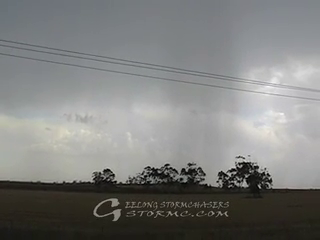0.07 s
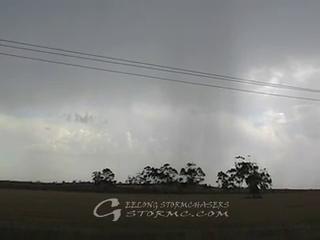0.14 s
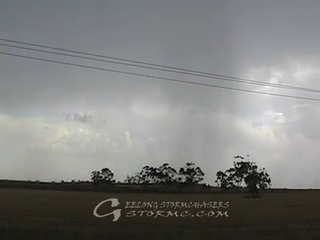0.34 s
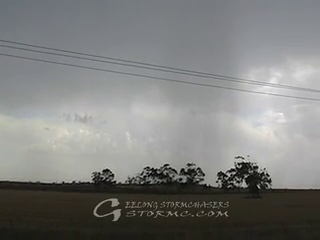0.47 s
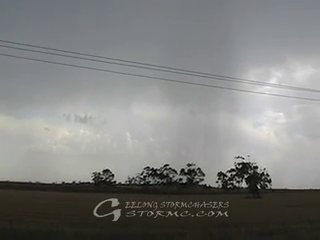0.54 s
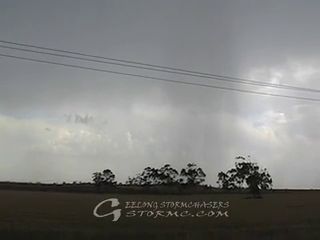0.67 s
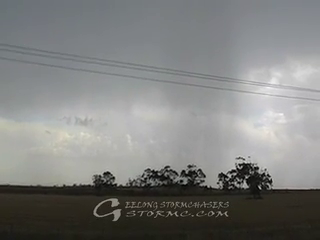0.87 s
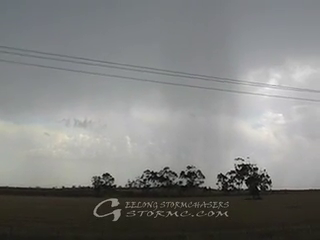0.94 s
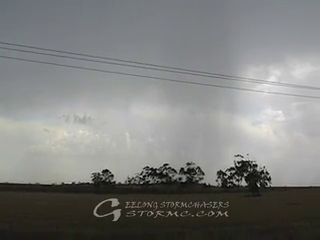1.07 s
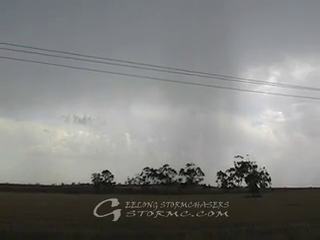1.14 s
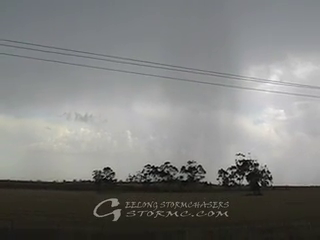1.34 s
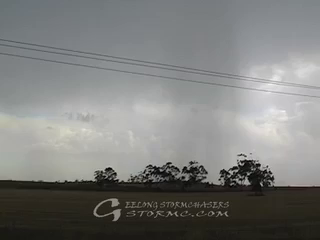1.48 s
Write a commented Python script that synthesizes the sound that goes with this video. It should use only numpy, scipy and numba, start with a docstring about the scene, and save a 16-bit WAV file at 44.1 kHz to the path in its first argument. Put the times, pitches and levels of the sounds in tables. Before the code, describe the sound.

Thunder rolls low over open farmland, breaks into rough crackling peals and heavy booms, then recedes in uneven rumbles; wind thumps the microphone, a faint bird trills far off, and steady hiss lies beneath.

```python
"""A low roll of thunder over open fields and a distant trilling bird, then peals and heavy booms.
The peals are swarms of random shock fronts and the booms single N-waves, both coloured by distance.
The roll swells towards the middle and recedes unevenly. Wind buffets a microphone with two ports as
brief low thumps with turbulence, the bird is gliding tones, a few ticks are short noise bursts.
Steady hiss lies beneath; a gain control pulls everything down, hiss included, when the sound is loud."""
import sys
import numpy as np
from scipy import signal
from scipy.fft import rfft, irfft
from scipy.io import wavfile
from numba import njit

SR = 44100
rng = np.random.default_rng(int(sys.argv[2]) if len(sys.argv) > 2 else 0)


def inscribe(sig):
    """Save sig as 16-bit PCM at rate SR to the path in sys.argv[1].

    A 1-D sig is mono; a 2-D sig holds one channel per row.
    Samples are clipped to [-1, 1] before scaling.
    """
    pcm = np.round(np.clip(np.atleast_2d(sig).T, -1, 1) * 32767)
    wavfile.write(sys.argv[1], SR, pcm.astype(np.int16))


N = 66150  # samples, 1.5 s


def undb(db):
    """Amplitude ratio is ten to the power of level over twenty."""
    return 10 ** (np.asarray(db) / 20)


def unit(x):
    """Normalisation to unit root-mean-square, over all channels together."""
    return x / np.sqrt(np.mean(x ** 2))


def bins():
    """Discrete Fourier frequencies in Hz, zero-padded to 2N; the lowest is raised to 1 Hz."""
    return np.maximum(np.fft.rfftfreq(2 * N, 1 / SR), 1)


def shape(points):
    """Spectrum in dB by linear interpolation of (f/Hz, level/dB) points along log frequency."""
    hz, db = np.array(points, float).T
    return np.interp(np.log(bins()), np.log(hz), db)


def colour(x, db):
    """Minimum-phase filtering: folding the cepstrum makes the response causal."""
    cepstrum = irfft(np.log(undb(db)))
    cepstrum[1:N] *= 2
    cepstrum[N + 1:] = 0
    response = np.exp(rfft(cepstrum))
    return irfft(rfft(x, 2 * N) * response)[..., :N]


def stereo(mid, side):
    """Sum-and-difference principle: left is mid plus side, right is mid minus side."""
    return np.array([mid + side, mid - side])


def thunder_colour():
    """Propagation loss takes the treble; Lorentzian resonances lift narrow bands, in dB."""
    # spectrum of the distant thunder: f/Hz, relative level/dB per Hz
    thunder_spectrum = [(25, -40), (60, -11.5), (105, -18), (135, -8), (170, -2.5), (250, -3.5),
                        (305, -9.5), (360, -6), (500, -11.5), (700, -22), (1000, -23.5), (1500, -30.5),
                        (2000, -40.5), (2600, -55.5), (6000, -87)]
    # resonances at the microphone: f/Hz, width/Hz, lift/dB
    resonances = [(174.5, 25.3, 5.5), (250.3, 34, 7), (417, 26, 0.5), (461.2, 38, 6.5), (642, 13, 2.5),
                  (807, 83, 7), (1049, 48, 3.5), (1361, 33, 6)]
    level = shape(thunder_spectrum)
    for hz, width, lift in resonances:
        level = level + lift / (1 + (2 * (bins() - hz) / width) ** 2)
    return level


def shocks():
    """Poisson-like impulse process: shock fronts of random time, sign and log-normal size."""
    shocks_per_s, scatter_db = 1800, 2.0
    arrives = rng.random(N) < shocks_per_s / SR
    sign = rng.choice([-1, 1], N)
    return arrives * sign * undb(scatter_db * rng.standard_normal(N))


def thunder(t):
    """Incoherent power addition: peals add to the roll, in a deep body and a crackle, alike at both ports."""
    # roll under the peals: t/s, body level/dB, crackle level/dB
    roll = np.array([(0, -33.5, -34.5), (.05, -31, -35), (.12, -32, -36.5), (.2, -36.5, -38.5),
                     (.3, -30, -29.5), (.4, -30, -31.5), (.44, -26, -32), (.545, -25.5, -33.5),
                     (.67, -20, -32), (.72, -27, -31.5), (.77, -26, -33.5), (.82, -27.5, -36),
                     (.92, -31.5, -37), (1.0, -35.5, -38), (1.039, -25.5, -35.5), (1.13, -26.5, -34),
                     (1.23, -29, -34.5), (1.32, -34.5, -39.5), (1.4, -29.5, -41.5), (1.5, -34, -43.5)])
    # peals: start t/s, hold/s, body level/dB, crackle level/dB
    peals = [(0.227, 0.043, -23, -29.5), (0.284, 0.05, -20.5, -44), (0.318, 0.059, -15.5, -31),
             (0.494, 0.042, -28, -35), (0.564, 0.069, -19, -32.5), (0.603, 0.023, -15, -28.5),
             (0.639, 0.011, -16, -27)]
    attack_s, release_s = .003, .006
    crossover_hz = 633  # body below, crackle above
    swarm, out = shocks(), 0
    for k, slope in enumerate((1, -1)):  # low-pass body, then high-pass crackle
        power = undb(np.interp(t, roll[:, 0], roll[:, 1 + k])) ** 2
        for start, hold, *db in peals:
            rise = np.clip((t - start) / attack_s, 0, 1)
            fall = np.exp(-np.maximum(t - start - hold, 0) / release_s)
            power = power + (undb(db[k]) * rise * fall) ** 2
        band = thunder_colour() - 10 * np.log10(1 + (bins() / crossover_hz) ** (8 * slope))
        steady_level = np.std(colour(swarm, band))
        out = out + colour(swarm * np.sqrt(power), band) / steady_level
    return out


def booms(t):
    """N-wave principle: each heavy front is one pressure ramp between two jumps, rounded by distance."""
    # single heavy fronts: t/s, peak level/dB, length of the pressure wave/s
    fronts = [(.323, -10.5, 0.0047), (0.345, -18, 0.0049), (.365, -11, 0.00317), (.376, -13.5, 0.0045),
              (0.488, -10, .0045), (0.512, -13.5, 0.0034), (0.607, -11, 0.0047), (0.616, -5.5, 0.0028),
              (0.635, -2.5, 0.00488), (0.671, -12.5, 0.0052), (0.761, -15.5, 0.00545),
              (1.262, -13.5, 0.0046)]
    rounding_hz = 570
    rounded = thunder_colour() - 10 * np.log10(1 + (bins() / rounding_hz) ** 4)
    out = 0
    for start, db, length in fronts:
        u = (t - start) / length
        n_wave = (2 * u - 1) * ((u >= 0) & (u < 1))
        wave = colour(n_wave, rounded)
        out = out + undb(db) * wave / np.abs(wave).max()
    return out


def wind(t):
    """Eddy convection: each eddy thumps the left port, then the right, and modulates low turbulence."""
    # buffets: t/s, half-length (Gaussian sigma)/s, level/dB, thump f/Hz, left minus right/dB
    buffets = [(0.098, 0.006, -30.5, 102, -9), (0.215, 0.0054, -25, 90, -8), (.243, 0.017, -22.5, 77.5, -4),
               (.27, 0.012, -11.5, 112, 5), (.495, 0.004, -28.5, 70, 13), (.585, 0.016, -29, 79, -11),
               (0.655, 0.0047, -45, 65.5, 1), (.738, 0.0099, -22, 119, -3.5), (0.828, 0.034, -36, 57.5, -3),
               (.88, 0.022, -36, 117, 4), (0.957, 0.011, -18.5, 97, 2), (.981, 0.02, -26.5, 103, -2),
               (1.044, .009, -36.5, 91, 16), (1.102, 0.016, -24, 96, 2.5), (1.176, 0.0098, -21.5, 119, 4),
               (1.351, 0.014, -54, 69.6, 11)]
    # spectrum of the turbulence: f/Hz, relative level/dB per Hz
    wind_spectrum = [(20, -9), (45, -7), (80, -1.5), (140, -0.5), (220, -7.5), (400, -17), (1000, -39.5),
                     (3000, -61.5), (6000, -68)]
    crossing_s = 0.00455  # travel time between the ports
    breeze_db = -44  # drive of the turbulence between buffets
    turbulence_db, mid_db = -5.5, -2.5  # relative to the push; mid relative to side
    ports = np.array([[.5], [-.5]])  # left, right
    force, thumps = undb(breeze_db), 0
    for at, half, db, hz, pan in buffets:
        u = t - at + crossing_s * ports
        push = undb(db + pan * ports) * np.exp(-.5 * (u / half) ** 2)
        thumps = thumps + np.sqrt(2) * push * np.sin(2 * np.pi * (hz * u + rng.random()))
        force = force + undb(turbulence_db) * push
    mid, side = unit(colour(rng.standard_normal((2, N)), shape(wind_spectrum)))
    return thumps + force * stereo(undb(mid_db) * mid, side)


def bird(t):
    """Frequency modulation: whistles whose pitch arches and falls; a run tends to be loudest midway."""
    # trills: first note t/s, last note t/s, nominal spacing/s, note length/s, f/Hz, level/dB
    trills = [(.046, 0.253, .052, 0.039, 3810, -57), (0.299, 0.629, .0327, .034, 3800, -55.5),
              (.77, 1.053, .0317, .033, 3794, -57), (1.204, 1.47, .0337, .034, 3820, -57.5)]
    fall_hz, bend_hz = 394, 610  # linear and quadratic pitch terms, time in note lengths
    edge_db, scatter_db = -2, .6  # level change at the ends of a run; random scatter per note
    octave_db = -12.5  # second harmonic relative to the first
    out = np.zeros(N)
    for first, last, spacing, length, hz, db in trills:
        notes = int(round((last - first) / spacing)) + 1
        for place in np.linspace(-1, 1, notes):
            detune, effort = rng.standard_normal(2)
            centre = (first + last + place * (last - first)) / 2
            u = (t - centre) / length
            on = np.abs(u) < .5
            u = u[on]
            pitch = hz * (1 + 0.0032 * detune) - fall_hz * u - bend_hz * u ** 2
            phase = 2 * np.pi * np.cumsum(pitch) / SR
            size = np.sqrt(2) * undb(db + edge_db * place ** 2 + scatter_db * effort)
            tone = np.sin(phase) + undb(octave_db) * np.sin(2 * phase)
            out[on] += size * np.cos(np.pi * u) ** 2 * tone
    return out


def ticks(t):
    """Exponential decay: each tick is a tiny high-passed noise burst, the same on both sides."""
    # ticks: t/s, envelope level before halving and filtering/dB
    onsets = [(.9363, -40), (1.2486, -38), (1.3833, -32), (1.4017, -38)]
    decay_s, highpass_hz = 0.00045, 7000
    envelope = sum(undb(db) * (t >= at) * np.exp(-np.abs(t - at) / decay_s) for at, db in onsets)
    highpass = signal.butter(2, highpass_hz, "high", fs=SR, output="sos")
    return signal.sosfilt(highpass, .5 * envelope * rng.standard_normal(N))


def hiss():
    """Stationary coloured noise of open air and microphone, mostly coherent between the sides."""
    # spectrum of the hiss: f/Hz, relative level/dB per Hz
    hiss_spectrum = [(300, 1), (1500, 6.5), (2200, 1), (2800, -1.5), (3500, -4), (4300, -5.5), (7000, -7.5),
                     (7660, -7.5), (10200, -7.5), (12700, -16), (14100, -26)]
    level_db, width = -51, 0.19  # width is the side-to-mid amplitude ratio
    mid, side = unit(colour(rng.standard_normal((2, N)), shape(hiss_spectrum)))
    return undb(level_db) * stereo(mid, width * side)


def scene():
    """Linear superposition of thunder, wind, bird and ticks over the hiss."""
    t = np.arange(N) / SR
    return thunder(t) + booms(t) + wind(t) + bird(t) + ticks(t) + hiss()


@njit
def follow(x, attack, release):
    """First-order smoothing with separate rise and fall coefficients per sample."""
    out, e = np.empty(len(x)), 0.
    for i in range(len(x)):
        e += (x[i] - e) * (attack if x[i] > e else release)
        out[i] = e
    return out


def record(dry):
    """Dynamic range compression: smoothed power above the threshold lowers the gain; the top is cut."""
    threshold_db, slope = -16, .85  # slope is dB of reduction per dB above the threshold
    attack_s, release_s = .03, .05
    top_hz = 13800
    power = dry.mean(axis=0) ** 2
    envelope = np.sqrt(follow(power, 1 / (attack_s * SR), 1 / (release_s * SR)))
    gain = np.maximum(envelope / undb(threshold_db), 1) ** -slope
    lowpass = signal.ellip(8, .2, 80, top_hz, fs=SR, output="sos")
    return signal.sosfilt(lowpass, dry * gain)


dry = scene()
out = record(dry)
inscribe(out)
```